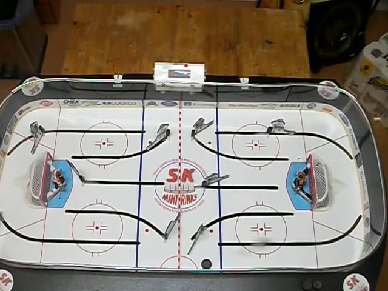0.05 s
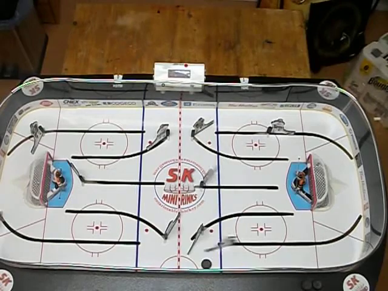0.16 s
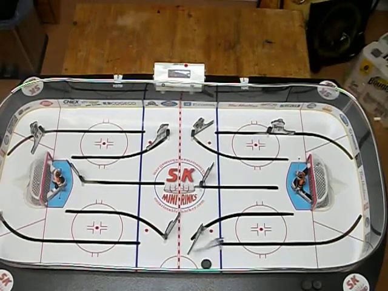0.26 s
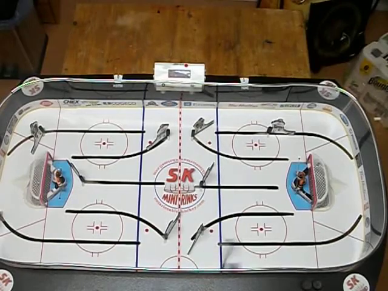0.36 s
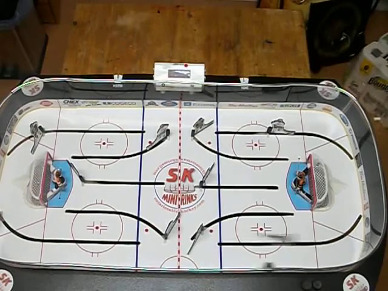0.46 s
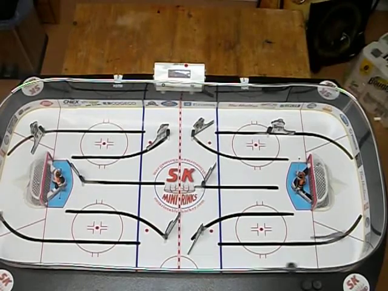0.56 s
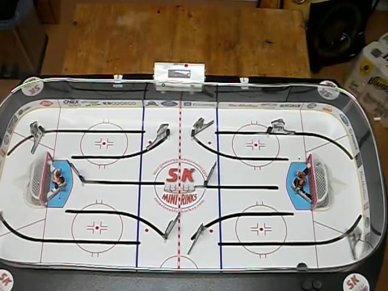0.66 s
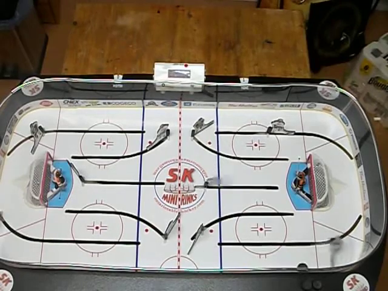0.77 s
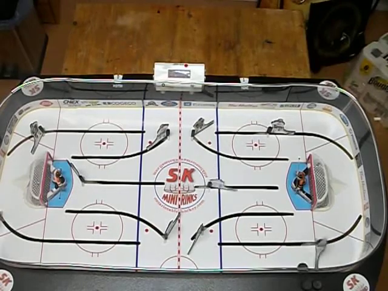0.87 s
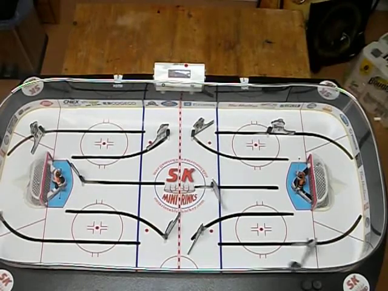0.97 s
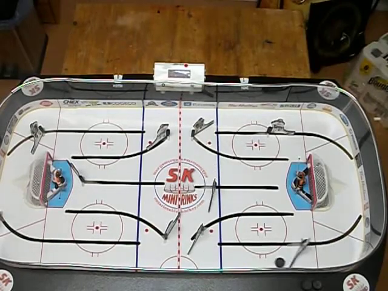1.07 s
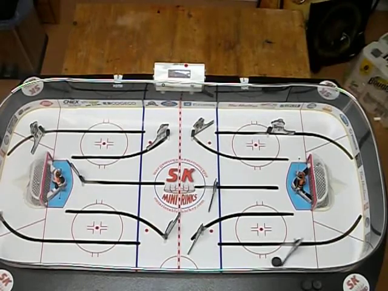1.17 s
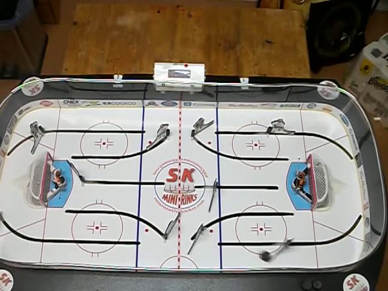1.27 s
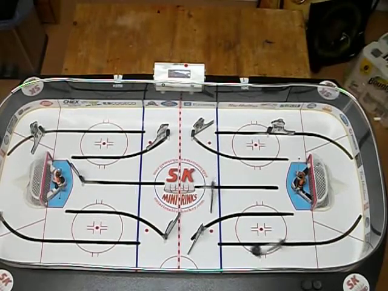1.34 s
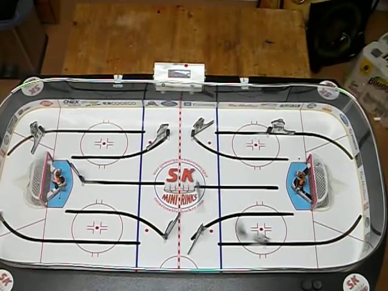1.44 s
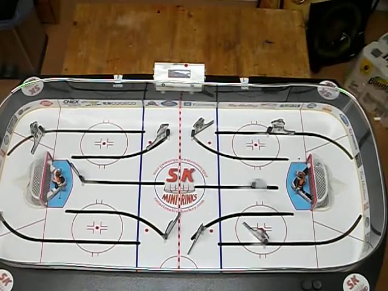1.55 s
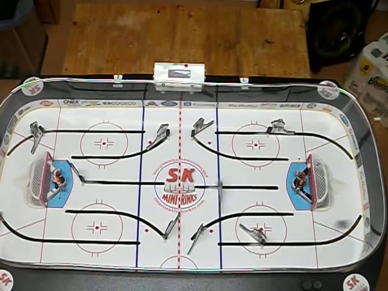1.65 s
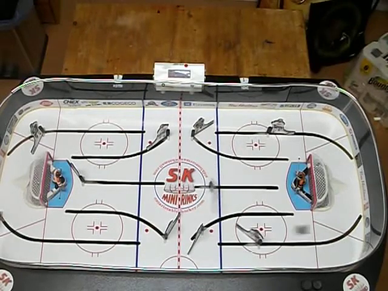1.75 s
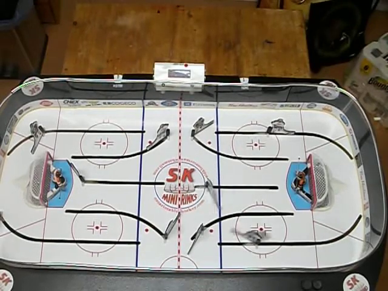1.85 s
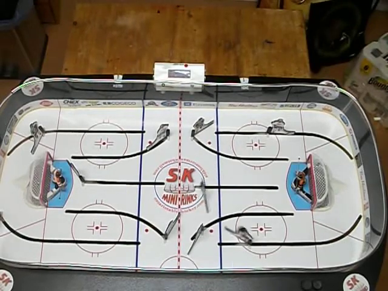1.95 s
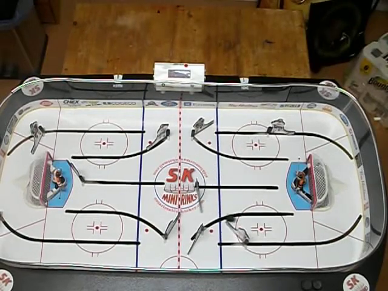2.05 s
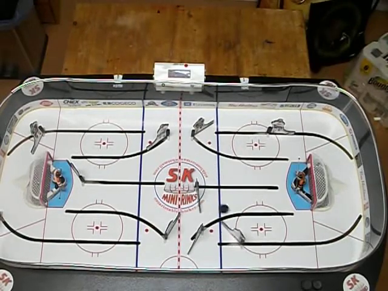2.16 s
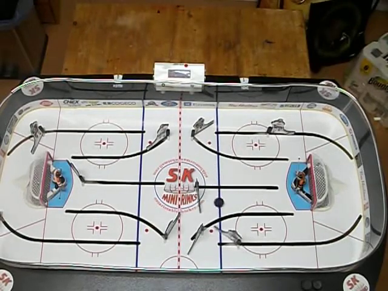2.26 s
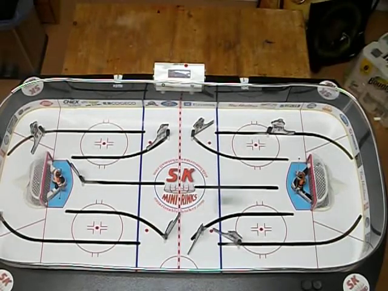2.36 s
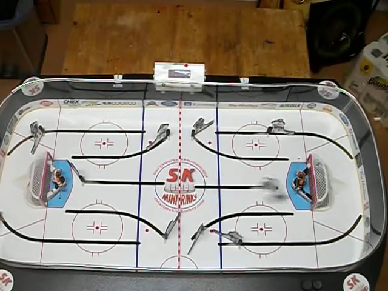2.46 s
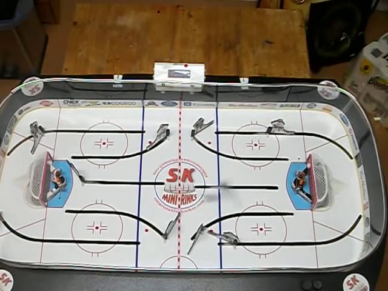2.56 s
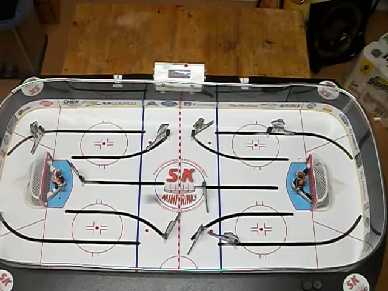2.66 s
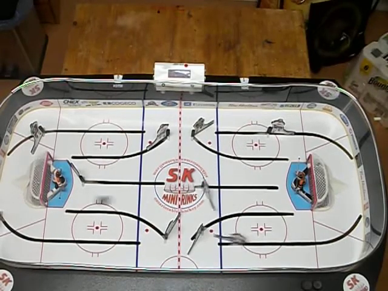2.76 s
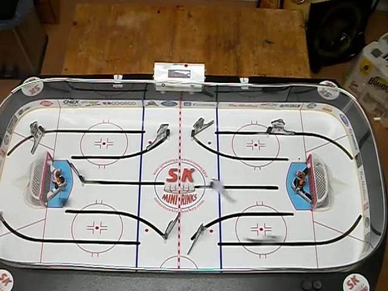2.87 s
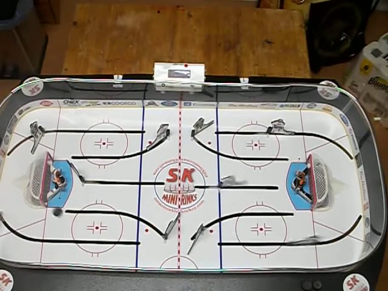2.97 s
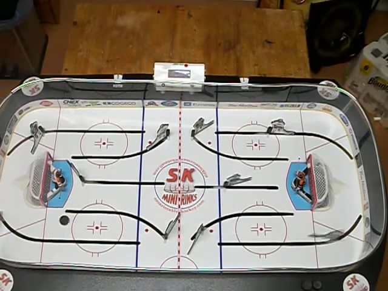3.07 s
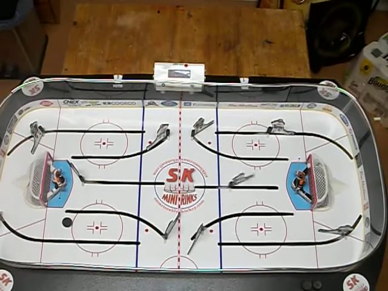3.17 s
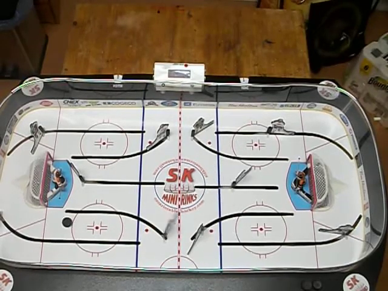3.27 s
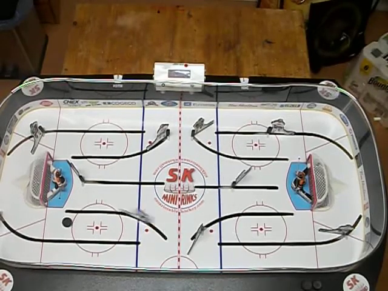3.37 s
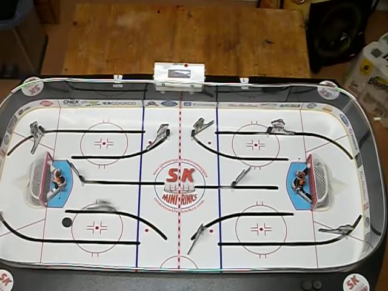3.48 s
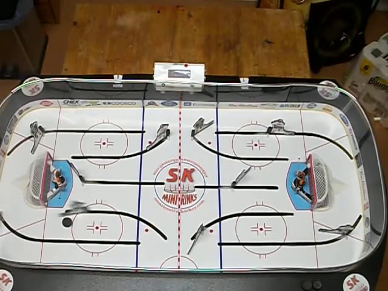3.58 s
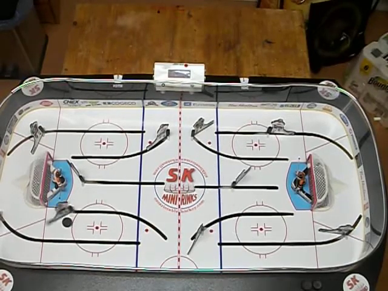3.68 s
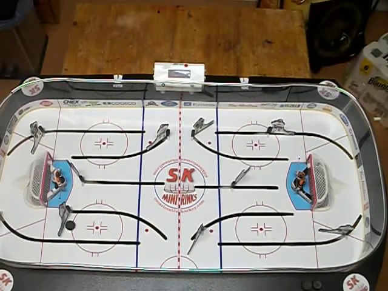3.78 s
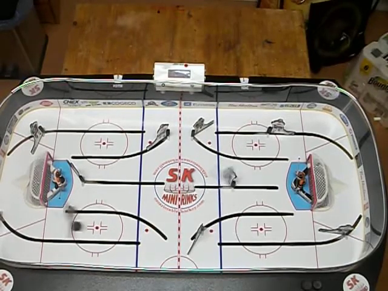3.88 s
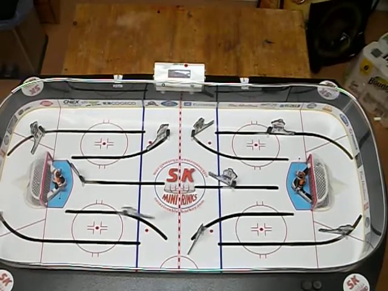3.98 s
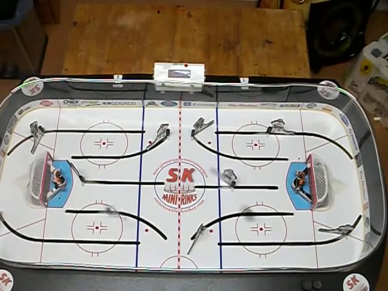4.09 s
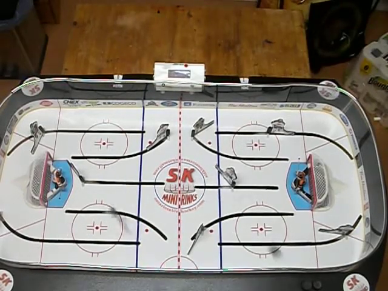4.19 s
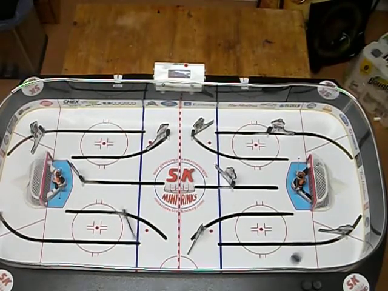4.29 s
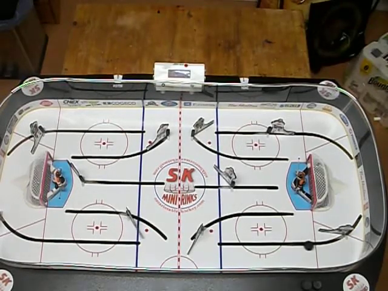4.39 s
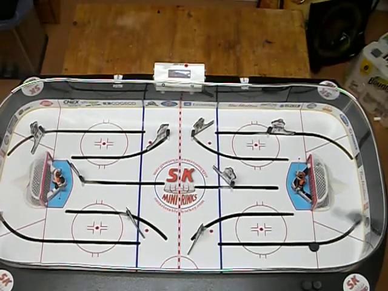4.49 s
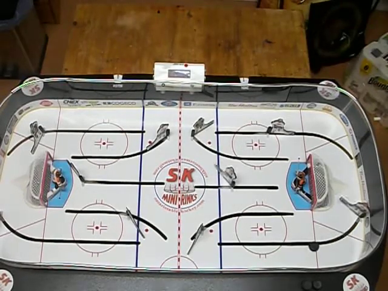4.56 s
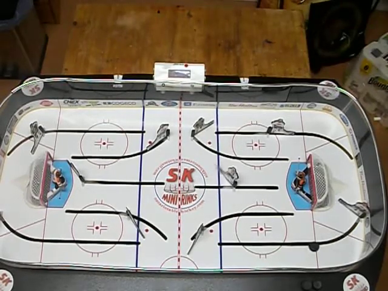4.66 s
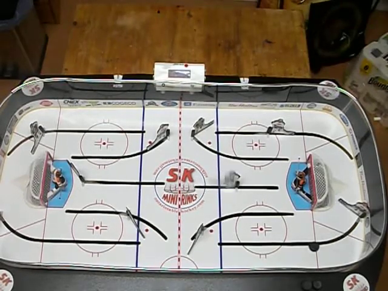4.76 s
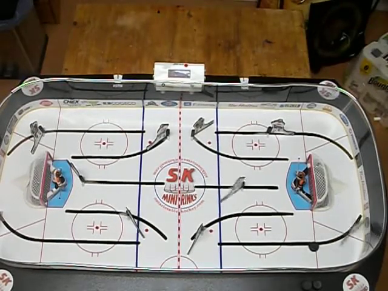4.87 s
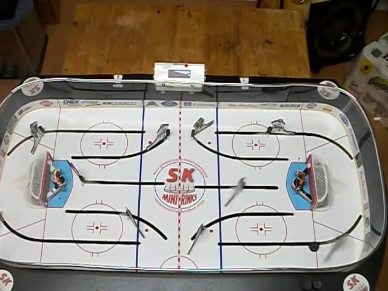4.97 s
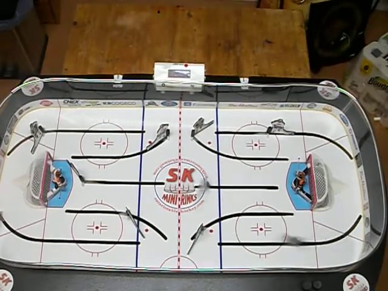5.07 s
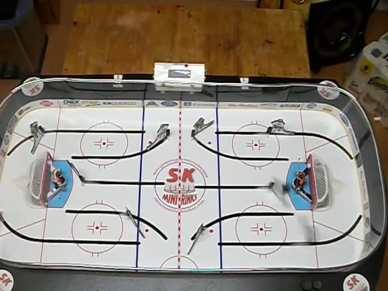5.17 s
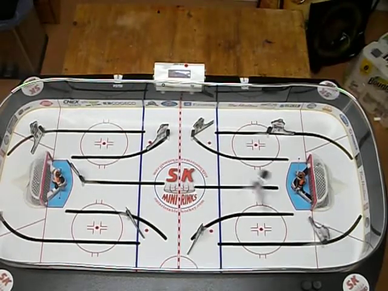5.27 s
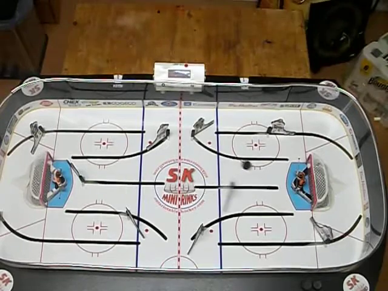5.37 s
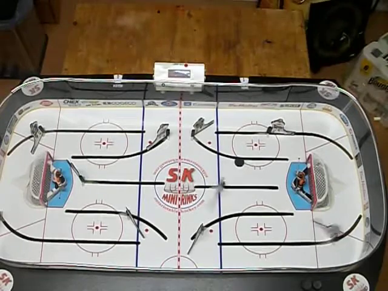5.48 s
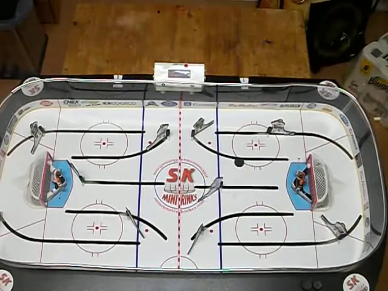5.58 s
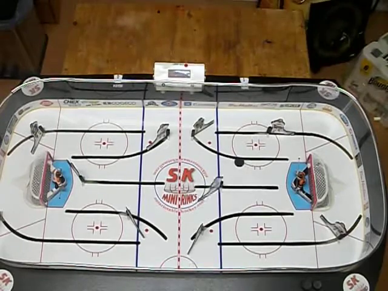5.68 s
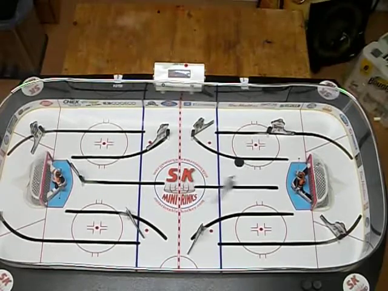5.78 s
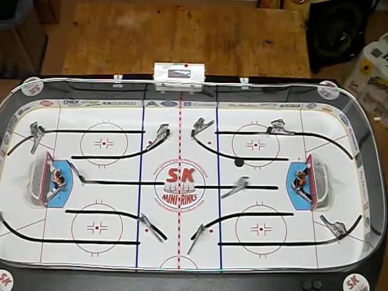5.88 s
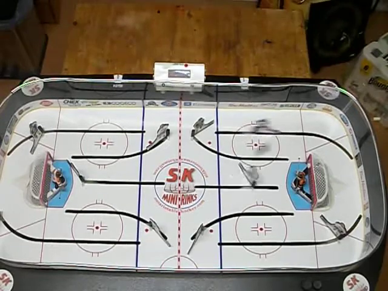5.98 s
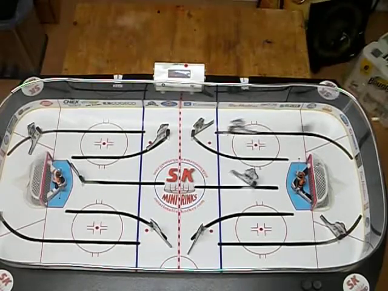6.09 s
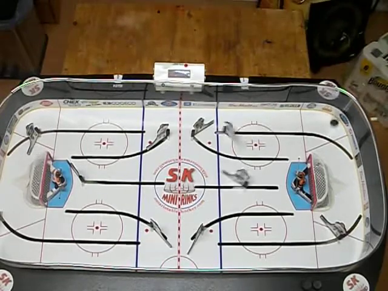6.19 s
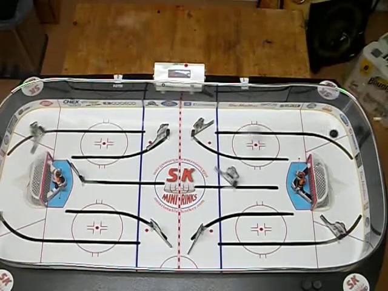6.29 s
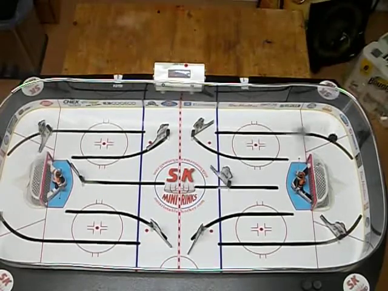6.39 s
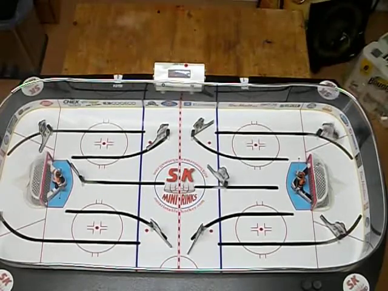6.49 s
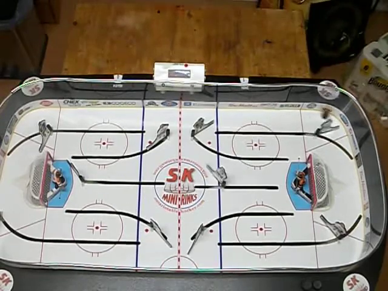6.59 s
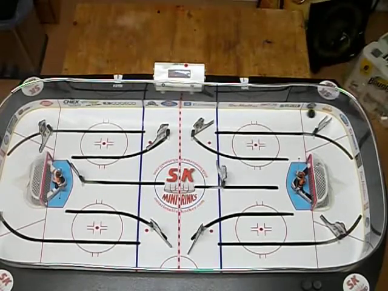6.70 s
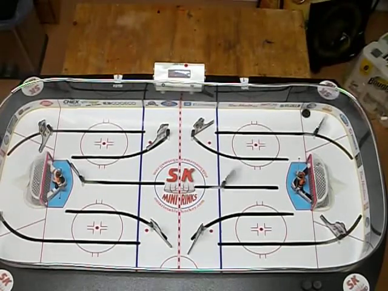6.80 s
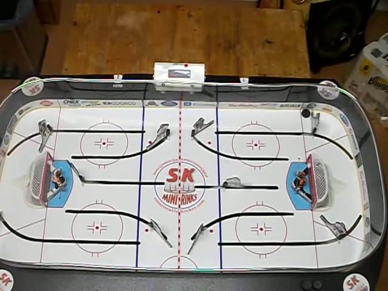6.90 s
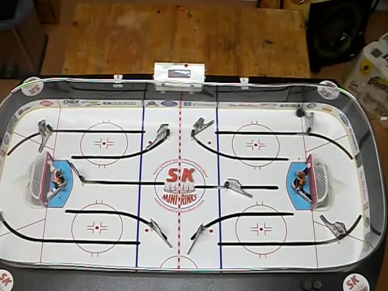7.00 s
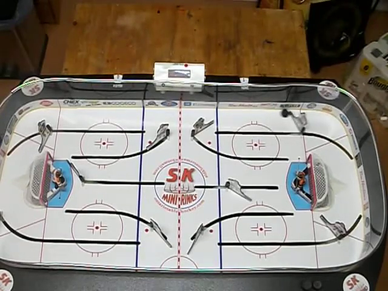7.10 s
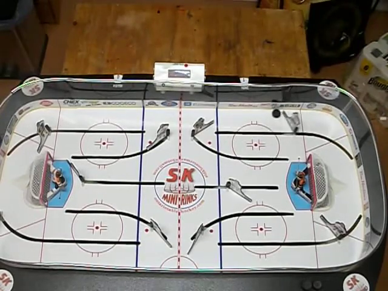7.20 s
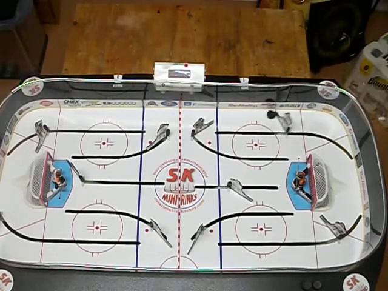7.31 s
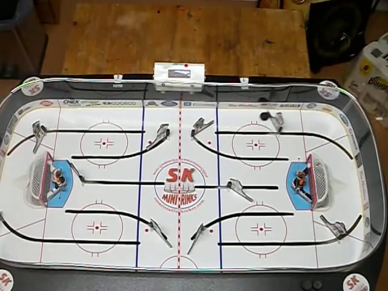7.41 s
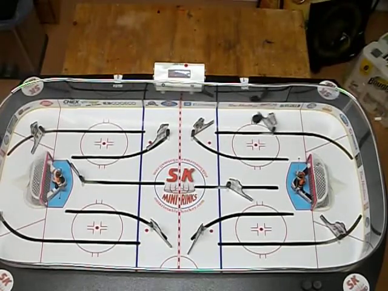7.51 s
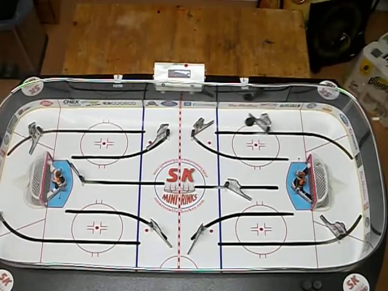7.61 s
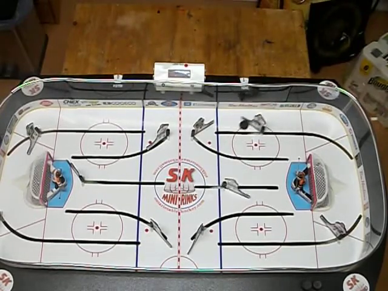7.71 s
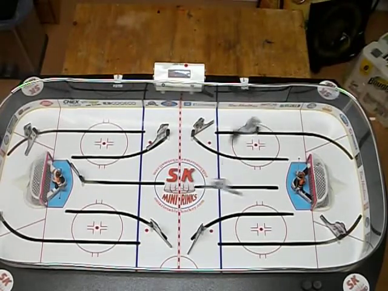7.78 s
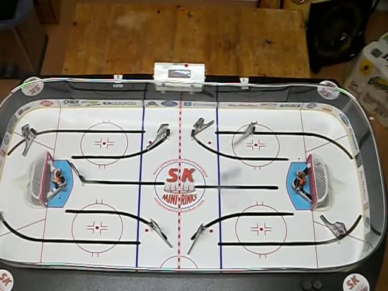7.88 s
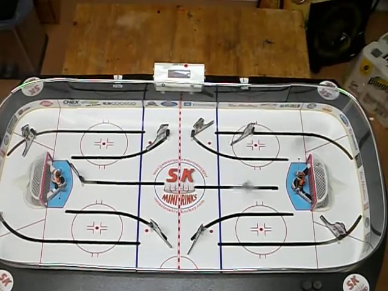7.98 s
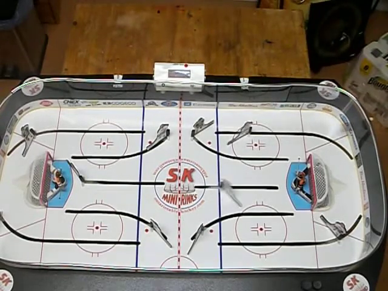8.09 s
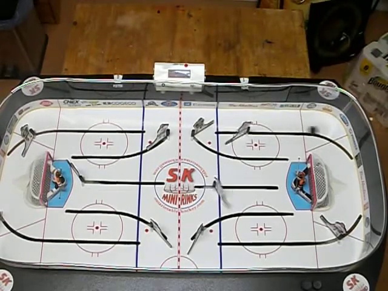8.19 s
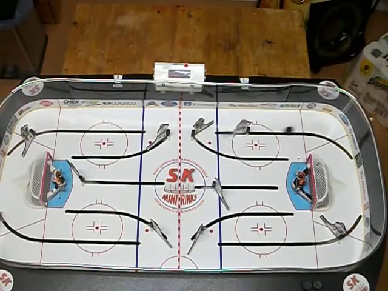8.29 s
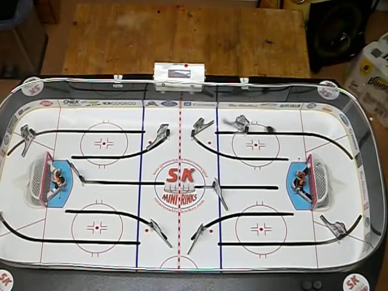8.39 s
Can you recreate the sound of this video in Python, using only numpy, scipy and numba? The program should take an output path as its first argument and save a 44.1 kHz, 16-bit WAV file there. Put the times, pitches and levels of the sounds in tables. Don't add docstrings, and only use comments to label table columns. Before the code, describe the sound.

Sharp plastic clacks, ticks and rattles erupt in irregular flurries on a hollow toy rink, with sliding rods rumbling between them in a small room.

```python
import sys
import numpy as np
from scipy import signal
from scipy.fft import rfft, irfft
from scipy.io import wavfile
from scipy.ndimage import uniform_filter1d
from numba import njit

SR = 44100
rng = np.random.default_rng(int(sys.argv[2]) if len(sys.argv) > 2 else 0)


def volts_from_decibels(level):
    exponent = np.asarray(level, float) / 20
    return 10 ** exponent


def transcribe(signal):
    frames = np.atleast_2d(signal).T
    limited = np.clip(frames, -1, 1)
    pcm = np.round(limited * 32767).astype(np.int16)
    wavfile.write(sys.argv[1], SR, pcm)


N = 372644

# [t/s at full speed, held/s, scrape level/dB, rumble level/dB]
STROKES = [(0.0, 0.031, -33, -33), (0.12, 0.058, -42, -34.5), (0.333, 0.049, -45, -35),
           (0.518, 0.22, -33, -27.5), (0.82, 0.15, -39, -31.5), (1.2, 0.57, -56, -50.5),
           (1.531, 0.12, -30.5, -36), (1.748, 0.013, -46, -39.5), (1.95, 0.17, -39.5, -37),
           (2.26, 0.049, -29.5, -41.5), (2.5, 0.014, -18, -31), (2.92, 0.22, -39.5, -44),
           (3.039, 0.09, -42, -30), (3.47, 0.12, -33, -31.5), (3.75, 0.11, -40.5, -45.5),
           (4.014, 0.039, -23.5, -24), (4.13, 0.065, -31.5, -34.5), (4.499, 0.18, -26.5, -29),
           (4.8, 0.27, -47.5, -45.5), (5.029, 0.18, -49, -31), (5.158, 0.03, -17.5, -31.5),
           (5.4, 0.049, -45, -43.5), (5.601, 0.13, -46, -37), (5.88, 0.29, -38, -37.5),
           (6.2, 0.29, -40, -34), (6.36, 0.36, -39.5, -33), (7.901, 0.062, -26.5, -32.5),
           (7.98, 0.11, -26.5, -35), (8.17, 0.04, -33, -29.5), (8.32, 0.065, -42.5, -31),
           (0.2, 0.1, -50.5, -59), (1.1, 0.023, -43.5, -44), (1.38, 0.16, -42, -48),
          (3.22, 0.045, -44.5, -39.5), (3.66, 0.0084, -33.5, -31), (4.72, 0.018, -53.5, -39.5),
          (5.52, 0.024, -44, -39), (6.7, 0.058, -42, -42.5), (6.82, 0.093, -58, -54),
          (3.41, 0.03, -44, -42.5), (4.35, 0.064, -41, -38), (7.0, 0.38, -51.5, -46), (7.4, 0.35, -51, -50)]
SPEED_UP_DB_S, SLOW_DOWN_DB_S = 226.5, 117
IDLE_SCRAPE_DB, IDLE_RUMBLE_DB = -50.5, -61

# [f/Hz, level/dB per Hz]
CRACK_SPECTRUM = [(500, -61.5), (900, -19), (1600, -14), (2400, -5.5), (3200, -1), (4000, 3.5), (4700, -2),
                  (5300, -7), (5750, -12.5), (6200, -18.5), (7000, -40), (9000, -63.5)]
# [f/Hz, level/dB per Hz]
RUMBLE_SPECTRUM = [(71, -53), (120, -12), (200, -10.5), (271, -7), (400, -5), (475, -1.5), (997, -6),
                   (2200, -8.5), (2860, -9), (4840, -120)]
# [f/Hz, level/dB per Hz]
HUM_SPECTRUM = [(15, -29.5), (25, 6), (54, -3), (186, -8.5), (338, -4), (701, -16.5), (786, -19),
                (987, -11.5), (1360, -29.5), (3970, -24), (4880, -15.5), (5860, -28), (7620, -54.5),
                (12900, -120)]
HUM_DB = -43.5
# [f/Hz, level/dB]
MOTOR_PARTIALS = [(55.6, -49), (118, -53.5), (151, -58), (221, -56.5), (323, -56), (1560, -62)]
# [f/Hz, T60/s, level/dB]
RINK_MODES = [(255, 0.07, -16), (343, 0.12, -11), (405, 0.08, -13.5), (480.5, 0.1, -4), (550, 0.038, 2.5),
              (655, 0.056, 4), (783, 0.023, -8.5), (940, 0.09, -2.5), (1232, 0.043, 6), (1480, 0.15, 2.5),
              (1730, 0.052, -0.5), (1992, 0.075, 2.5), (2300, 0.042, 8.5)]

# [t/s, peak level/dB, ring f/Hz, thud level/dB re clack, contact/ms]
SHOTS = [(1.5685, 23, 3610, -46, 4.1), (1.5852, 9.5, 4090, -47.5, 0.9), (1.5963, 4.5, 5080, -37.5, 1.2),
         (1.6967, 14.5, 4080, -38.5, 2.2), (1.8918, 10, 4276, -67, 2), (2.0057, 8, 4305, -56, 1.7),
         (2.2121, 11.5, 3670, -50, 3.2), (2.4339, 5, 4400, -23.5, 2.4), (2.5084, 7, 3870, -27.5, 3),
         (2.5796, 10.5, 3900, -42, 1.3), (4.1209, 17, 4050, -31, 6.4), (4.2515, 16.5, 4100, -36, 3.3),
         (4.3063, 9.5, 3830, -50.5, 0.89), (5.157, 10, 4070, -46.5, 2), (5.2389, 4.5, 5170, -37.5, 3.1),
         (5.2571, 12.5, 3740, -37.5, 2.2), (6.0364, 13, 4090, -26, 4.4), (6.2658, 15.5, 3510, -29, 2.1),
         (6.5706, 7, 3150, -47.5, 1.6), (6.6346, 8.5, 3600, -24.5, 2.4), (7.9161, 3.5, 3330, -25, 2.8),
         (7.9727, 15.5, 4400, -34.5, 3.2), (8.1635, 14, 4050, -24, 2.4), (8.238, 17.5, 4280, -26, 5.1)]
# [t/s, peak level/dB, ring f/Hz, thud level/dB re clack]
BOUNCES = [(0.381, 0.5, 4960, -25), (0.407, 1, 3910, -24.5), (0.5227, -2, 4200, -11), (0.623, 0, 4280, -17),
           (0.6454, -7.5, 3850, -4.5), (1.5523, -4.5, 3550, -18.5), (1.5795, -3, 3960, -36),
           (1.6418, 1.5, 3660, -22), (1.907, -17, 3940, -40), (2.311, -10.5, 3830, -42),
           (2.4244, -9.5, 3200, -20), (2.4514, -8, 4100, -19.5), (2.4888, -4, 3500, -46),
           (2.5555, -2.5, 3330, -25.5), (2.6298, -3.5, 3640, -42), (3.8161, -9, 4040, -45),
           (4.0176, -2.5, 3120, -19.5), (4.0414, 0.5, 4250, -25), (4.339, -3, 4160, -17),
           (4.4612, -2, 4220, -11.5), (5.1127, 4, 3850, -19), (5.223, 0.5, 3720, -16),
           (5.2434, 21.5, 4800, -32.5), (5.2644, -17, 4690, -31), (6.0535, 2, 4240, -34),
           (6.3773, -2.5, 3890, -61), (5.093, -14, 3600, -2), (6.4387, -2.5, 3880, -15),
           (7.9374, -10, 3560, -26), (7.9764, -2.5, 4080, -21), (7.9874, 4, 3960, -43)]
# [t/s, peak level/dB, ring f/Hz, thud level/dB re clack]
SHAKES = [(0.0935, -12, 3300, -4.5), (0.5032, -3, 4020, -6.5), (0.5989, 0.5, 4050, -12),
          (0.818, -12, 4220, -7), (1.5161, -8, 4020, -10.5), (2.0476, -6.5, 4140, -23),
          (2.0745, -12, 3370, -14), (2.2344, -6, 3940, -29), (2.3929, -9, 3930, -24),
          (2.4722, 1, 4070, -18), (2.6805, -19.5, 3530, -15.5), (3.0046, -4.5, 2740, -15),
          (3.2175, -20.5, 3430, -10), (3.5058, -8.5, 3000, -7.5), (3.5419, -11, 3990, -7),
          (3.6385, -17, 3240, -6), (3.9077, -12.5, 3470, -16.5), (3.9513, -9, 4020, -16),
          (4.0281, -2.5, 3520, -5), (4.527, -4.5, 4400, -12.5), (5.0029, -15.5, 3850, -3),
          (5.3047, -13, 4150, -50), (5.36, -9.5, 3800, -15.5), (5.69, -20.5, 3000, -5),
          (6.0161, -5, 3650, -8), (6.2925, -5, 4330, -13.5), (6.3379, -9, 4470, -9),
          (7.887, -15.5, 3430, -6), (7.9472, -4.5, 3500, -27), (8.1539, -9, 4440, -17)]
# [t/s, peak level/dB, ring f/Hz]
TICKS = [(0.7608, -9, 3880), (0.921, -24.5, 4200), (1.009, -9, 4080), (1.261, -20.5, 4120),
         (1.6635, -22.5, 4550), (1.9609, -12, 3980), (2.6264, -15, 4760), (3.1154, -15.5, 4710),
         (3.1543, -14, 4000), (4.001, -1, 3920), (4.656, -6.5, 2300), (4.855, -26.5, 3650),
         (4.3204, -7.5, 4020), (5.121, -3, 3240), (5.2326, -4, 4070), (5.3164, -6.5, 3470),
         (5.3312, -12, 3770), (5.4624, -15, 4730), (5.846, -9, 2850), (5.9593, -13.5, 4020),
         (6.1922, -4, 4200), (6.2093, -12, 3960), (6.527, -20, 3530), (6.6758, -11.5, 3930),
         (7.0137, -12.5, 4260), (7.1009, -20.5, 4500), (7.3349, -13.5, 4300), (8.0393, -6.5, 4140),
         (0.4845, -20, 4100), (1.9535, -16, 3900), (2.4478, -7, 3890), (6.5918, -13.5, 3200),
         (1.5415, -9, 3790), (1.5655, -8, 3610), (2.429, -1.5, 4530), (3.0098, -4, 4100),
         (3.8885, -21, 3800), (3.931, -32, 3800), (5.1468, -6, 4000), (7.9712, 4, 4100),
         (8.1095, -13, 4040), (8.328, -9.5, 2530), (8.3773, -12.5, 3460)]
# [t/s, peak level/dB, ring f/Hz, thud level/dB re clack]
KNOCKS = [(0.178, -24, 3370, -15), (0.3276, -22.5, 3390, -13), (0.336, -14.5, 3160, -5),
          (0.4929, -17, 4620, -7.5), (0.5324, -2, 3410, -20), (0.6324, -2.5, 3980, -17),
          (0.6594, -1, 3950, -15.5), (1.033, -17, 4150, -6), (1.8606, -20.5, 4440, -14.5),
          (2.1782, -12, 4380, -22), (2.9401, -29.5, 4500, 1), (3.4005, -29.5, 2900, 5),
          (3.448, -19.5, 1770, -20), (4.652, -15.5, 2100, 2), (4.765, -32, 2300, -8),
          (5.6262, -21.5, 2950, -4), (5.8266, -14.5, 3180, -8), (6.1458, -9.5, 3780, -7),
          (6.1762, -11, 2690, -5.5), (6.4093, -8, 3670, -17), (6.953, -29, 3060, -9),
          (8.1217, -9.5, 3510, -15), (8.3426, -17.5, 4120, 1)]
# [t/s, peak level/dB, ring f/Hz]
POSTS = [
    (1.7, -12, 2010),
    (1.735, -16, 2130),
    (1.785, -22, 2050),
    (2.18, -22.5, 1240),
    (4.6477, -15.5, 1930),
    (7.0137, -22, 2600),
]
# [t/s, peak level/dB, ring f/Hz]
RATTLES = [(0.0884, -17.5, 4180), (0.1504, -31.5, 4260), (0.4756, -22.5, 3980), (0.7853, -15, 4240),
           (0.9828, -27, 3200), (1.9414, -12.5, 3910), (2.1314, -23, 3660), (2.6964, -20.5, 3890),
           (2.9542, -31, 3630), (2.9724, -30, 3840), (3.047, -26, 2310), (3.0724, -32, 2490),
           (3.134, -18.5, 4160), (3.7133, -32, 3880), (4.397, -15, 4270), (4.4754, -11.5, 3450),
           (4.6073, -14.5, 3670), (4.9503, -27, 3680), (5.3068, -9, 4080), (5.3434, -10.5, 4080),
           (5.3877, -18, 3660), (5.524, -28.5, 2260), (5.5876, -32, 2350), (5.612, -27, 2890),
           (5.669, -21.5, 3770), (5.8603, -20, 2410), (5.8713, -14.5, 3270), (5.8933, -19, 3410),
           (6.2316, -20.5, 4050), (6.4847, -19, 3980), (6.6022, -13, 3990), (6.7634, -28.5, 3940),
           (6.8224, -32, 3890), (7.1203, -27, 3940), (7.871, -25.5, 3470), (7.92, 2.5, 3500),
           (7.9275, -7.5, 3680), (7.9408, -3.5, 3500), (7.9803, 3, 3220), (8.0217, -8.5, 4100),
           (8.0342, -8, 4220), (8.0915, -16, 4400), (8.276, -10, 3700), (8.2959, -20, 3950)]

SHOT_SHIVER_DB, SHIVER_PER_DB = -27, -0.17
BOUNCE_MS, BOUNCE_SHIVER_DB = 2.9, -17
SHAKE_MS, SHAKE_SHIVER_DB = 2.9, 3
TICK_THUD_DB, TICK_MS, TICK_SHIVER_DB = -20, 2.3, -14
KNOCK_MS, KNOCK_SHIVER_DB = 2.6, -11
POST_THUD_DB, POST_MS, POST_SHIVER_DB = -22, 1.7, 19
RATTLE_LIFT_DB, RATTLE_THUD_DB, RATTLE_MS, RATTLE_SHIVER_DB = 4, -24.5, 1.2, -19.5

WANDER_RAD = 0.6
ZONES = 3
ROOM_T60_S, ROOM_DB, ECHO_DB = 0.4, -17, -24


def level(x, db):
    return x * volts_from_decibels(db) / np.sqrt(np.mean(x ** 2))


def colour(x, spectrum):
    hz, db = np.transpose(spectrum)
    size = 8192
    grid = np.log(np.arange(size // 2 + 1) * SR / size + 1)
    log_gain = np.interp(grid, np.log(hz), np.maximum(db, -70)) * np.log(10) / 20
    cepstrum = irfft(log_gain)
    cepstrum[1:size // 2] *= 2
    cepstrum[size // 2:] = 0
    impulse = irfft(np.exp(rfft(cepstrum)))
    return signal.fftconvolve(x, impulse)[:len(x)]


def walk(rate_hz):
    k = int(SR / rate_hz)
    return uniform_filter1d(np.repeat(rng.standard_normal(N // k + 1), k), k)[:N]


def fade(t, t60):
    return np.exp(-np.log(1000) * t / t60)


def strokes():
    t = np.arange(0, N + 64, 64) / SR
    s, held, scrape_db, rumble_db = np.array(STROKES).T[:, :, None]
    rising_db = -SPEED_UP_DB_S * np.maximum(s - t, 0)
    falling_db = -SLOW_DOWN_DB_S * np.maximum(t - s - np.abs(held), 0)

    def gain(db, idle_db):
        power = (volts_from_decibels(db + rising_db + falling_db) ** 2).sum(0) + volts_from_decibels(idle_db) ** 2
        return np.interp(np.arange(N) / SR, t, np.sqrt(power))

    return gain(scrape_db, IDLE_SCRAPE_DB), gain(rumble_db, IDLE_RUMBLE_DB)


def slides():
    scraping, rumbling = strokes()
    sparse = rng.random(N) < 1500 / SR
    tick_db = np.minimum(1.9 * rng.exponential(size=N), 10)
    ticks = sparse * volts_from_decibels(tick_db) * rng.standard_normal(N)
    rub = level(ticks, -13.5) + level(rng.standard_normal(N), -11.5)
    scrape = level(colour(rub, CRACK_SPECTRUM), 0) * scraping * volts_from_decibels(2.6 * walk(55))
    rumble = level(colour(rub[::-1], RUMBLE_SPECTRUM), 0) * rumbling * volts_from_decibels(2.6 * walk(30))
    return scrape + rumble


@njit
def follow(x, attack, release):
    y, e = np.empty(len(x)), 0.
    for i in range(len(x)):
        e += (abs(x[i]) - e) * (attack if abs(x[i]) > e else release)
        y[i] = e
    return y


def hum(play):
    t = np.arange(N) / SR
    air = level(colour(rng.standard_normal(N), HUM_SPECTRUM), HUM_DB) * volts_from_decibels(1.2 * walk(4.1))
    motor = np.zeros(N)
    for hz, db in MOTOR_PARTIALS:
        strength = volts_from_decibels(db + 1.5 + 1.1 * walk(6.6))
        motor += strength * np.sin(2 * np.pi * hz * t + 0.4 * walk(6.3))
    busy = follow(play, 1 / (0.013 * SR), 1 / (0.4 * SR))
    return (air + motor) * (1 + (busy / volts_from_decibels(-9.5)) ** 2) ** -0.7


def blows():
    rows = [tuple(r) + (SHOT_SHIVER_DB + SHIVER_PER_DB * (r[1] - 8),) for r in SHOTS]
    kinds = ((BOUNCES, (BOUNCE_MS, BOUNCE_SHIVER_DB)),
             (SHAKES, (SHAKE_MS, SHAKE_SHIVER_DB)),
             (TICKS, (TICK_THUD_DB, TICK_MS, TICK_SHIVER_DB)),
             (KNOCKS, (KNOCK_MS, KNOCK_SHIVER_DB)),
             (POSTS, (POST_THUD_DB, POST_MS, POST_SHIVER_DB)))
    for table, shared in kinds:
        rows += [tuple(r) + shared for r in table]
    rattle = (RATTLE_THUD_DB, RATTLE_MS, RATTLE_SHIVER_DB)
    rows += [(s, db + RATTLE_LIFT_DB, hz) + rattle for s, db, hz in RATTLES]
    return rows


def even(noise, shape):
    burst = noise * shape
    head, head_shape = burst[:1024], shape[:1024]
    for _ in range(5):
        spectrum = rfft(head)
        head = irfft(spectrum / (np.abs(spectrum) + 1e-9))
        head = np.sign(head) * np.abs(head) ** 0.6 * head_shape
    head = head * np.sqrt(np.sum(head_shape ** 2) / np.sum(head ** 2))
    return np.concatenate([head, burst[1024:]])


def rink_modes(t, chance):
    hz, t60, mode_db = np.array(RINK_MODES).T[:, :, None]
    slips = WANDER_RAD * rng.standard_normal((len(RINK_MODES), len(t) // 128 + 1)).cumsum(axis=1)
    slips = uniform_filter1d(np.repeat(slips, 128, axis=1)[:, :len(t)], size=128)
    tones = np.sin(2 * np.pi * hz * (1 + 0.054 * chance[1]) * t + slips)
    return (volts_from_decibels(mode_db + 3.1 * chance[0]) * tones * fade(t, 1.06 * t60)).sum(0)


def clacks():
    out, t = np.zeros((ZONES, N + SR)), np.arange(SR // 5) / SR
    for k, (s, db, ring_hz, thud_db, ms, shiver_db) in enumerate(blows()):
        noise = rng.standard_normal(len(t))
        chance = rng.standard_normal((2, len(RINK_MODES), 1))
        contact_s = np.clip(ms, 1, 7) / 1000
        contact = np.minimum(t / 0.0003, 1) * np.exp(-(t / contact_s) ** 2.6)
        bounces = volts_from_decibels(2.8 * np.repeat(rng.standard_normal(len(t) // 128 + 1), 128)[:len(t)])
        shiver = bounces * np.minimum(t / 0.001, 1) * (fade(t, 0.092) + volts_from_decibels(-5.0) * fade(t, 0.41))
        hit = even(noise, contact)
        shaking = noise * volts_from_decibels(shiver_db + 5.0) * shiver
        struck = hit + shaking * np.clip((2700 - ring_hz) / 600, 0.25, 1)
        ring = signal.iirpeak(ring_hz, 4.0, SR)
        ringing = signal.lfilter(*ring, signal.lfilter(*ring, struck))
        ring_db = 1.5 + 14 * max(np.log2(2800 / ring_hz), 0)
        blow = level(colour(hit + shaking, CRACK_SPECTRUM), 0) + level(ringing, ring_db)
        thud = volts_from_decibels(thud_db - 13.0) * np.minimum(t / 0.0052, 1) * rink_modes(t, chance) * bounces ** 1.2
        i = int(s * SR)
        out[k % ZONES, i:i + len(t)] += volts_from_decibels(db - 0.5) * (blow / np.abs(blow).max() + thud)
    return out[:, :N]


def room(x):
    t = np.arange(SR // 2) / SR
    tail = rng.standard_normal(len(t)) * fade(t, ROOM_T60_S) * np.clip(t / 0.0083, 0, 1)
    tail = volts_from_decibels(ROOM_DB) * tail / np.sqrt(np.sum(tail ** 2))
    lags_s = np.array([.0035, .0058, .0085, .0117, .015, .02, .026, .033, .041]) * (1 + 0.15 * rng.random())
    signs = np.sign(rng.standard_normal(len(lags_s)))
    echoes = np.zeros(len(t))
    echoes[(lags_s * SR).astype(int)] = volts_from_decibels(ECHO_DB) * fade(lags_s, 0.41) * signs
    return x + signal.fftconvolve(x, echoes + tail)[:N]


def scene():
    play = sum(room(zone) for zone in clacks()) + slides()
    return (play + hum(play))[None]


def band_limit(x):
    return signal.sosfilt(signal.butter(12, 6750, fs=SR, output="sos"), x)


def record(dry):
    low_pass = signal.cheby2(8, 55, 7400, fs=SR, output="sos")
    narrow = signal.sosfilt(low_pass, 5 * np.tanh(dry / 5))
    busy = follow(narrow[0], 1 / (0.029 * SR), 1 / (0.07 * SR))
    narrow = narrow * (1 + (busy / volts_from_decibels(1.5)) ** 2) ** -0.35
    clipped = np.clip(narrow, -0.99, 0.99)
    lean = np.tanh(np.abs(narrow - clipped) / 0.7)
    clipped = clipped - 0.36 * lean + 0.1 * uniform_filter1d(lean, size=120)
    high_pass = signal.butter(6, 7400, "high", fs=SR, output="sos")
    overtones = signal.sosfiltfilt(high_pass, clipped)
    clipped = signal.filtfilt(*signal.iirnotch(6800, 9, SR), clipped) + 0.8 * overtones
    top_cut = signal.ellip(6, 0.1, 25, 15800, fs=SR, output="sos")
    top = signal.sosfiltfilt(top_cut, clipped)
    mix = np.clip(top, -1, 1) - 0.001
    return band_limit(mix)


dry = scene()
out = record(dry)
transcribe(out)
```